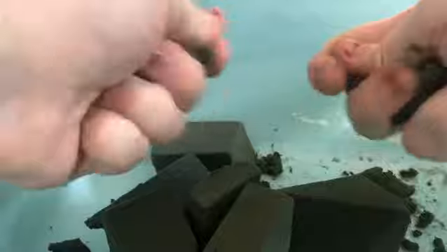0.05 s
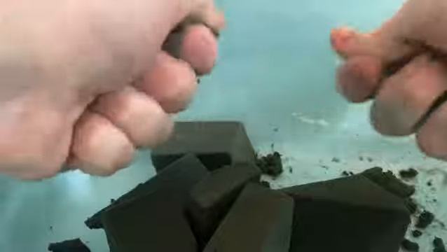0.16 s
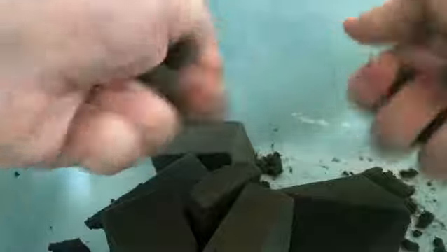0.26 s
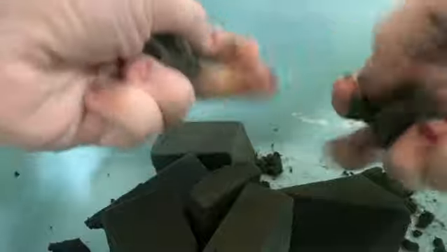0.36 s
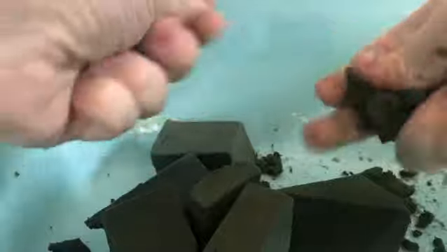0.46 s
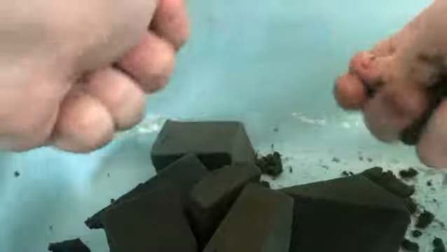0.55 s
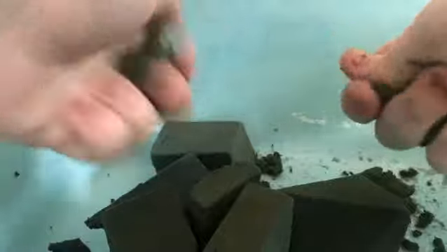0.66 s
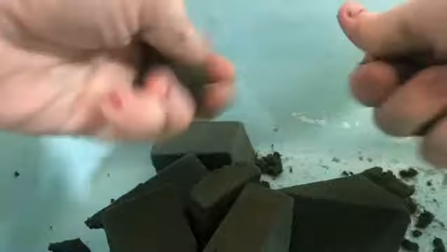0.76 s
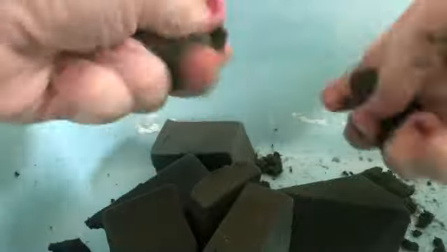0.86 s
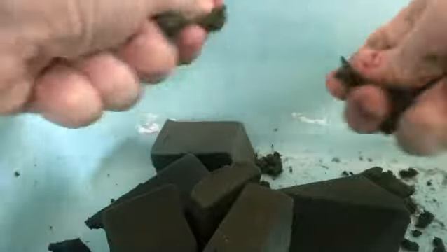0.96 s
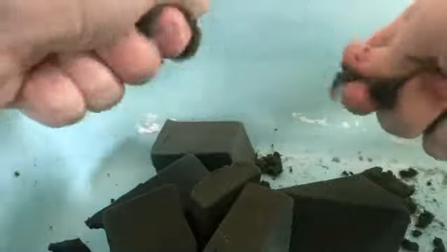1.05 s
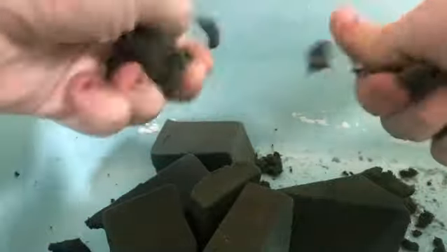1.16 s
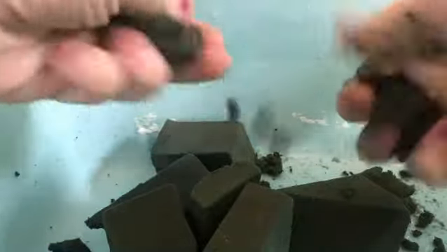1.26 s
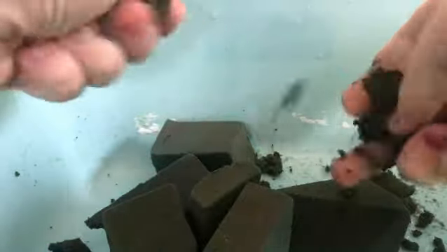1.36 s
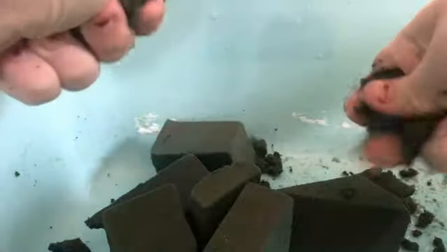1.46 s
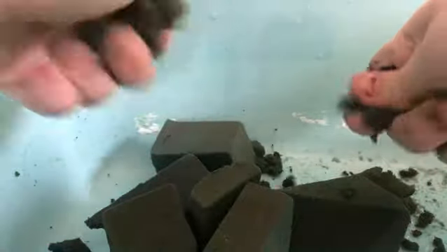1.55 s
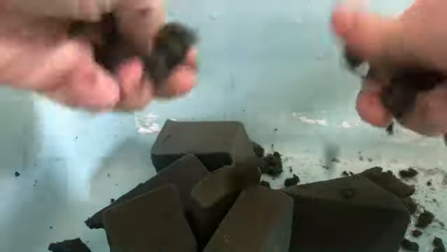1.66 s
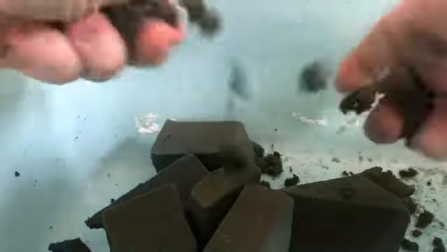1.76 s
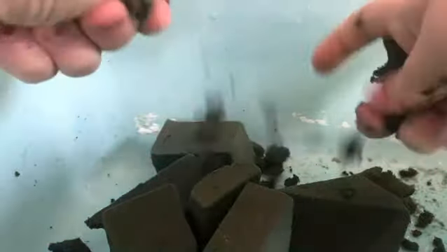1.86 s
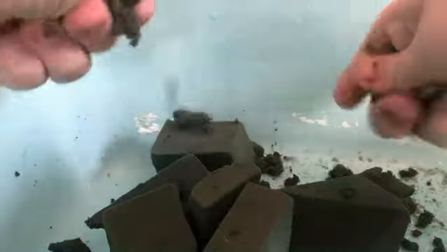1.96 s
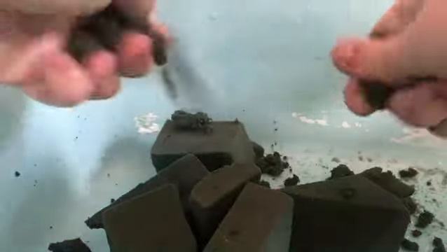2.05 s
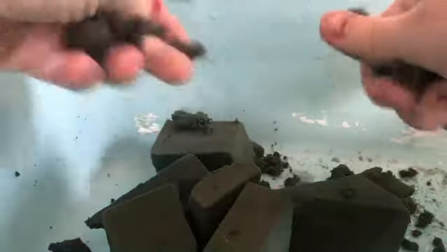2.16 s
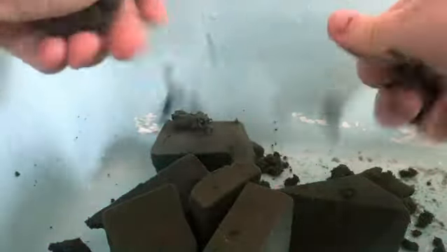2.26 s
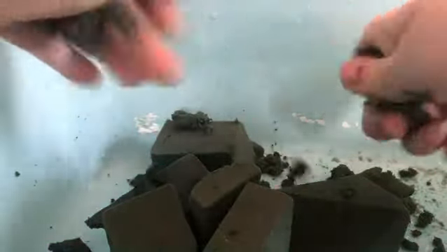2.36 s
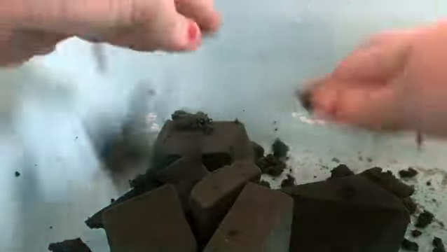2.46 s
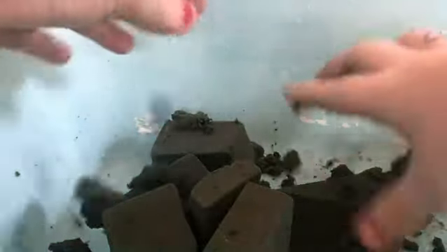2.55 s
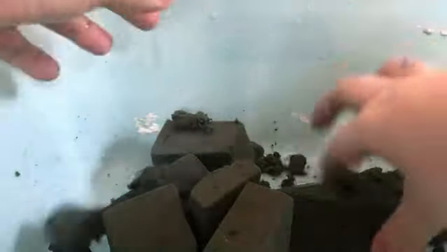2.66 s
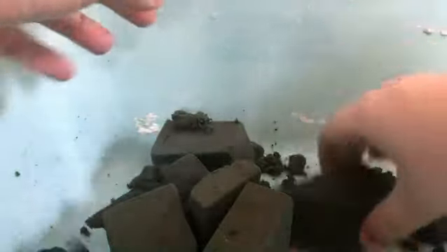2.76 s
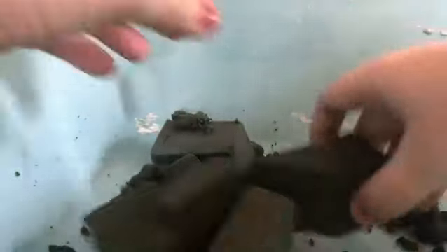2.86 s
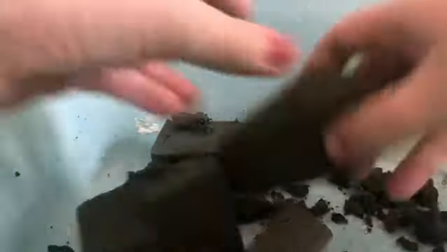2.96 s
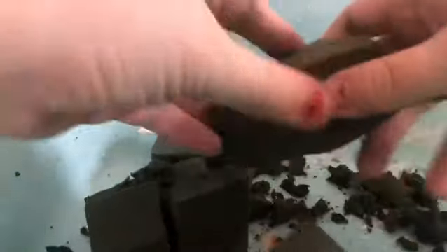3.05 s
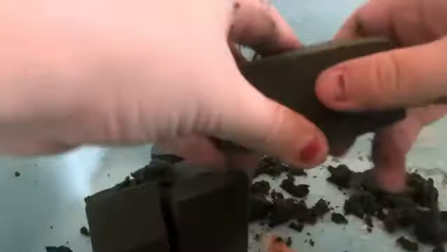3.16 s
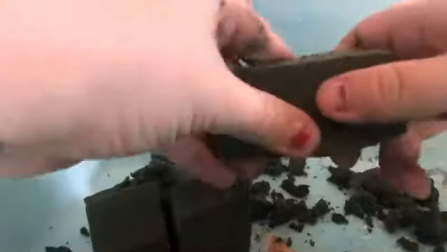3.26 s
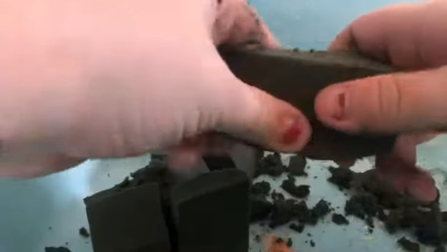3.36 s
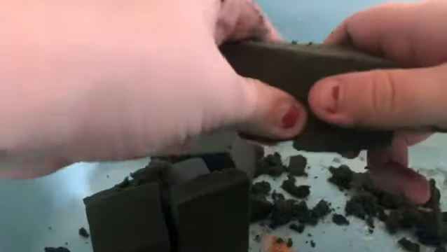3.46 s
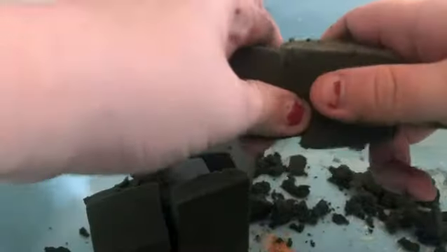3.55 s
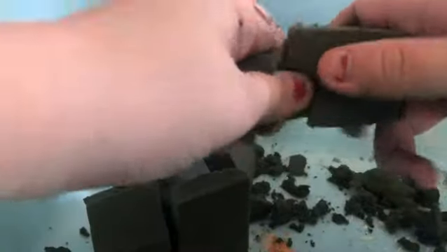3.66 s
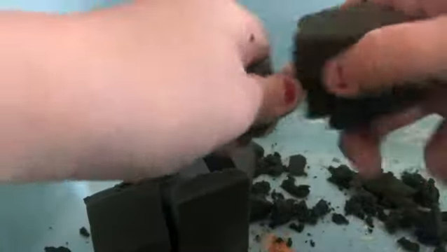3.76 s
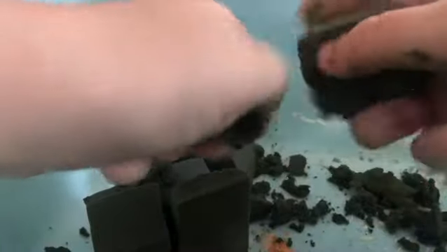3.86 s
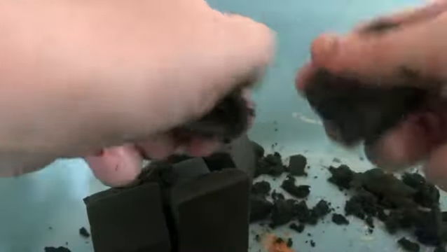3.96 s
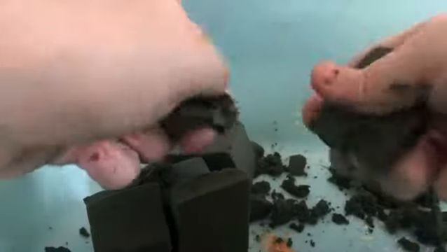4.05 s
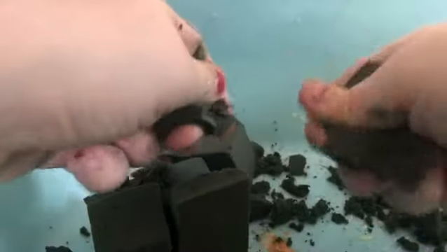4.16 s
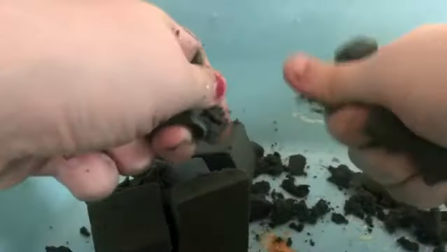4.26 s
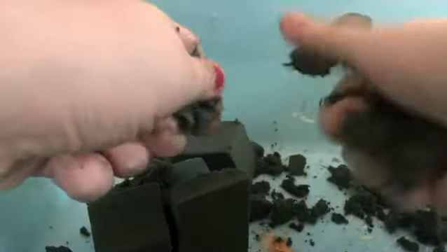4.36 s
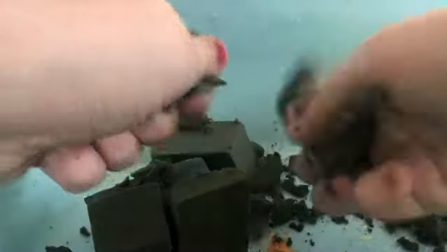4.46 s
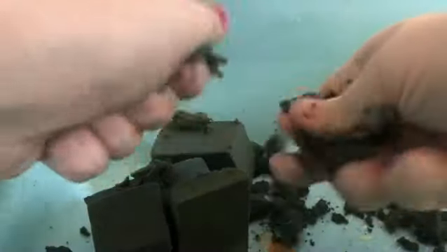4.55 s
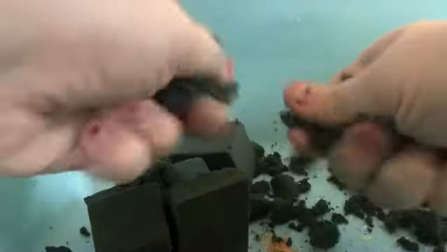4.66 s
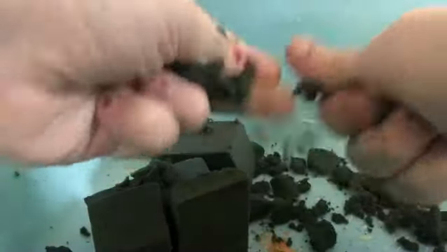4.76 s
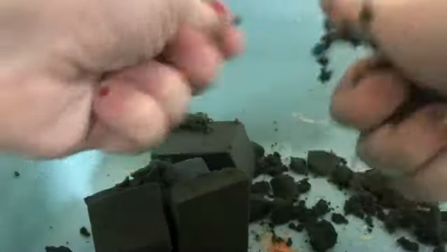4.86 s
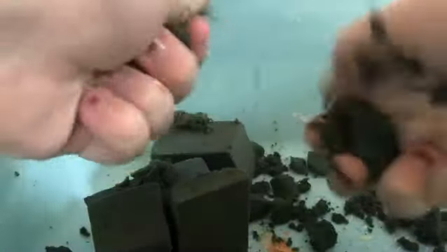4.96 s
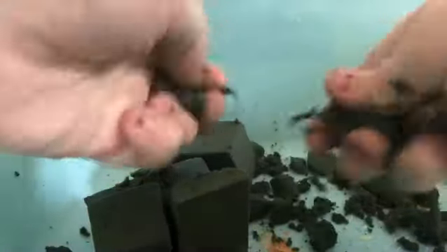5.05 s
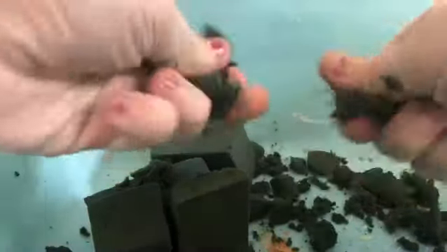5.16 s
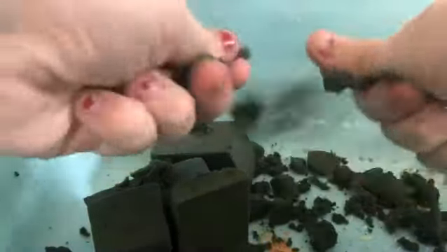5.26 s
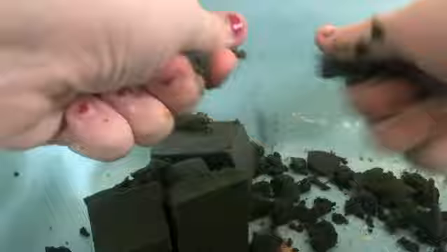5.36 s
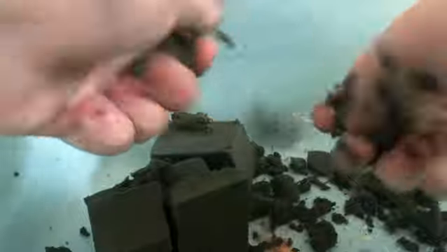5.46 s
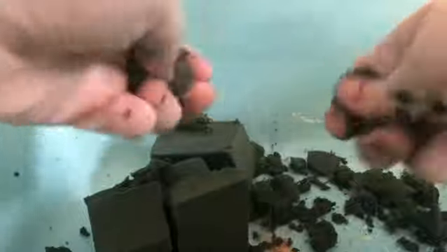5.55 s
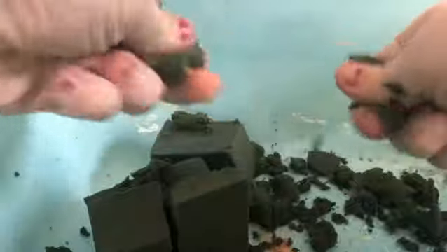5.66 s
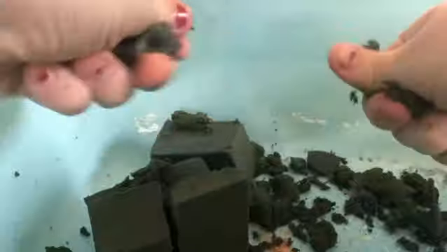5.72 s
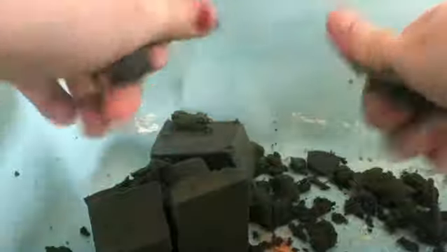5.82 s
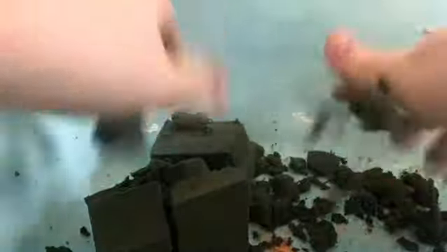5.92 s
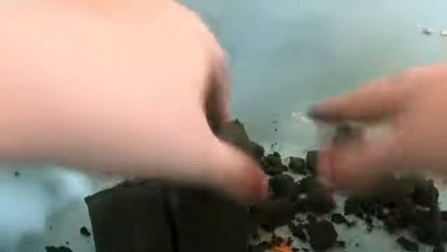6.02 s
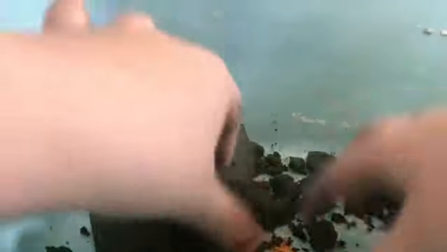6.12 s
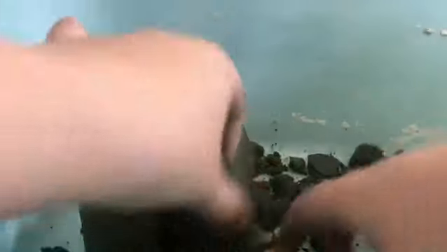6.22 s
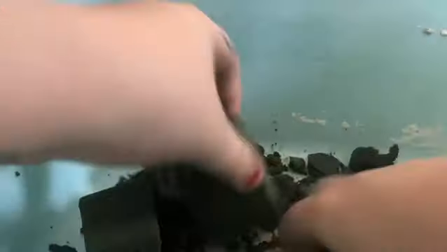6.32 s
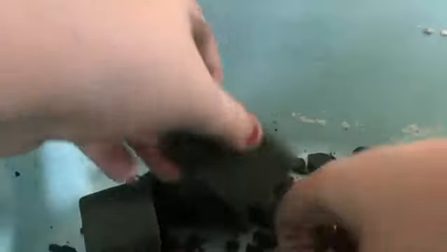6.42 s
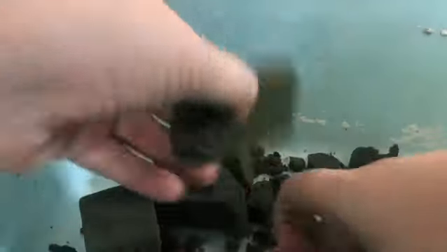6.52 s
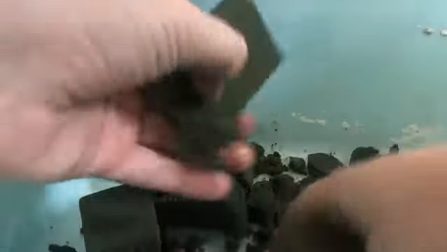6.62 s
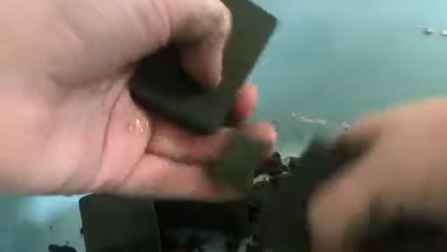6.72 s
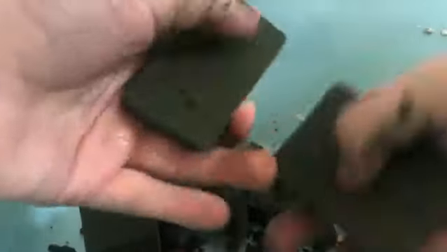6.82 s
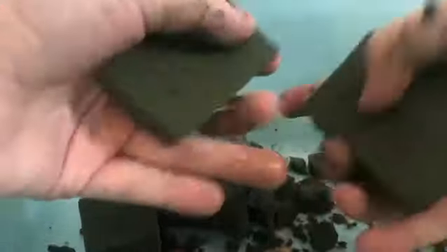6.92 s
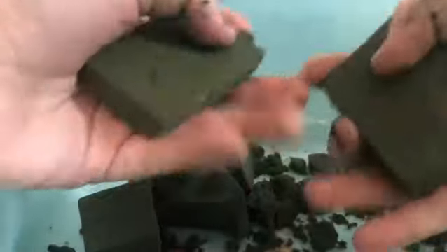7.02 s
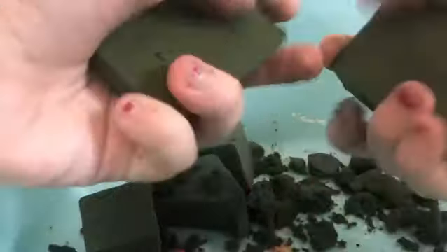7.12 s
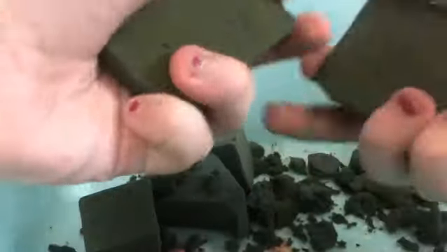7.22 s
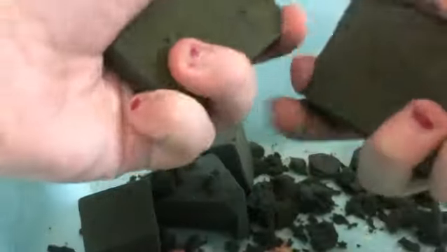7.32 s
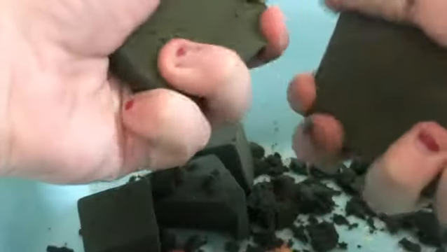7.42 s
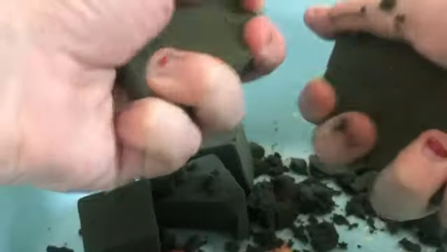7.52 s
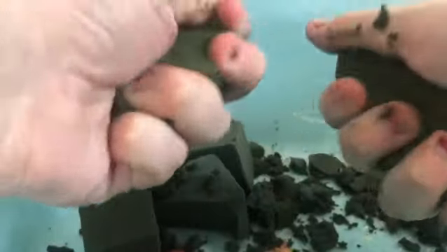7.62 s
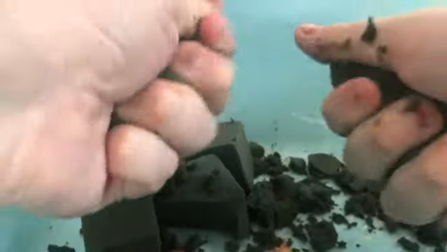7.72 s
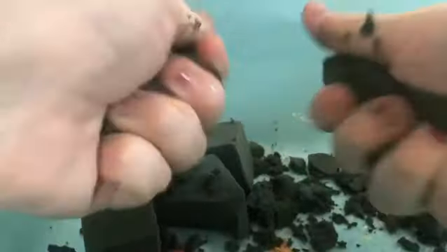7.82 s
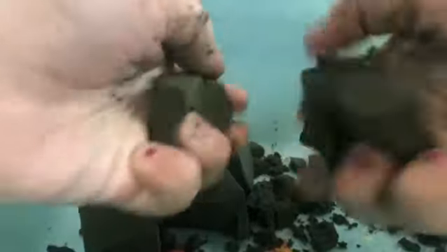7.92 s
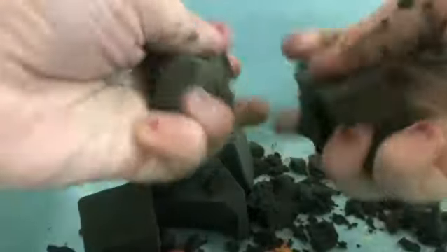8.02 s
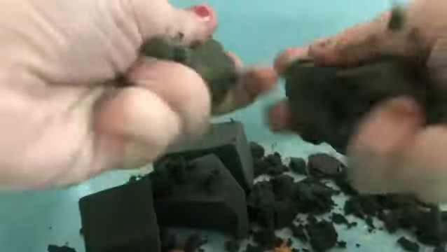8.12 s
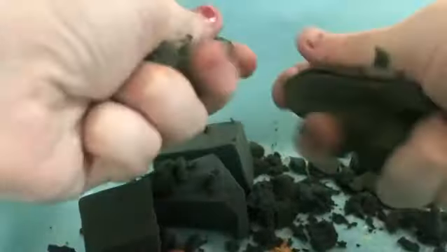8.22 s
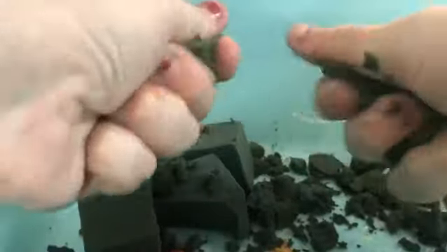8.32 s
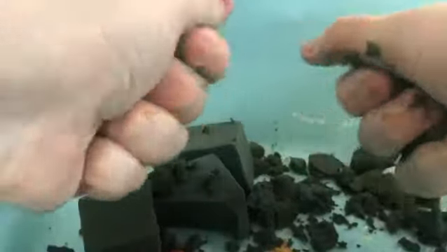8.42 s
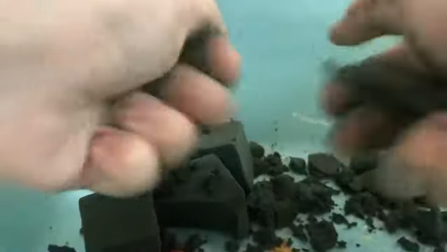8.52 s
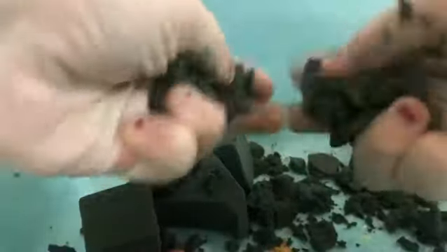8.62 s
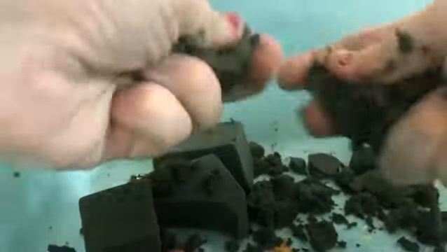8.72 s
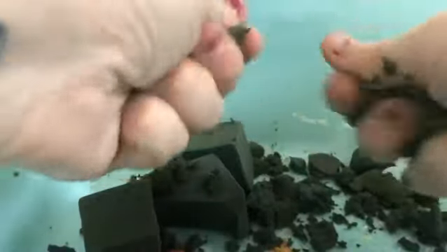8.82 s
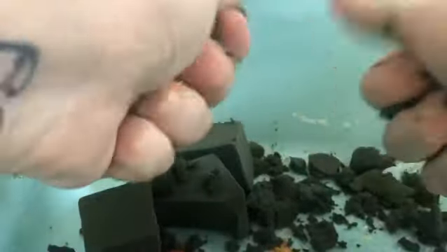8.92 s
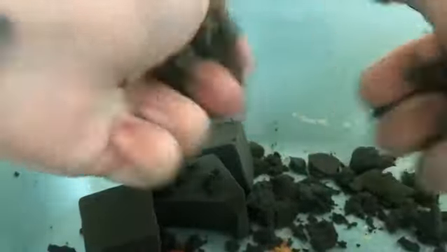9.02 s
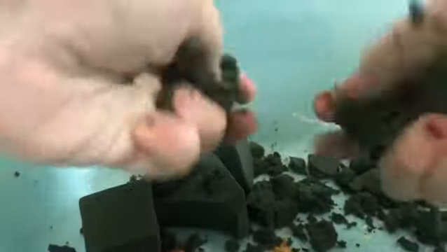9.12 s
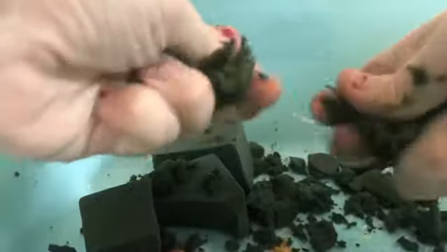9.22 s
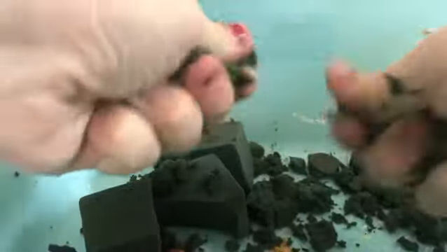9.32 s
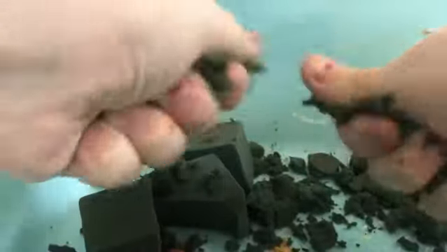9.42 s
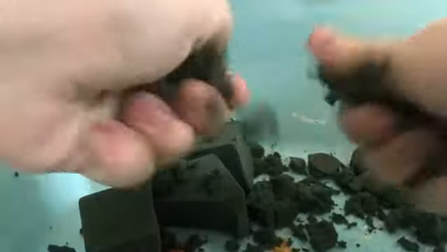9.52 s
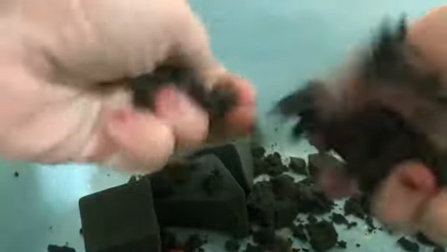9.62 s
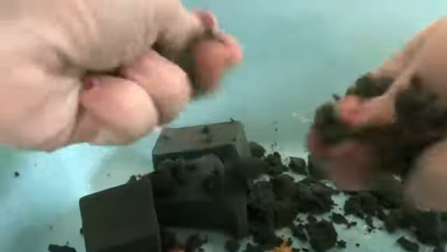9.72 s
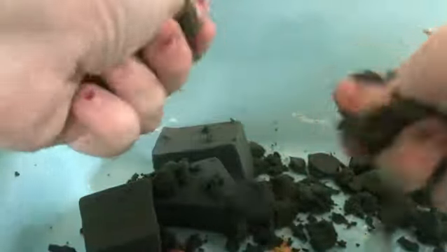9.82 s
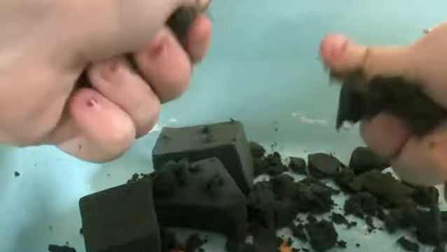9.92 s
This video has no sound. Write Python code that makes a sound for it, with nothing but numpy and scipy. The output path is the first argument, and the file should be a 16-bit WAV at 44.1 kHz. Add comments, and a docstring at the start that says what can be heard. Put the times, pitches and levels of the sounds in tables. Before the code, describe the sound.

Close, dry crunching of brittle foam blocks squeezed in fists: hissing powder, fine crackle, crumbs tapping a tub, then a dense volley of cracks.

```python
"""Two hands crush blocks of baked floral foam over a plastic tub, close to a microphone.
First the fists grind in soft hissing strokes: tiny grains make the powder, larger ones the crackle.
Then lumps knock on the tub floor and blocks drag through crumbs, before a sharp volley of noise-burst snaps.
Grinding, more knocks and drags lead to a second, denser volley near 7.3 s; quieter grinding ends it.
Random small cracks and crumbs fill in throughout; a short hollow ring colours the foam, over faint room air."""
import sys
import numpy as np
from scipy import signal
from scipy.fft import irfft
from scipy.io import wavfile
from scipy.ndimage import map_coordinates

SR = 44100
rng = np.random.default_rng(int(sys.argv[2]) if len(sys.argv) > 2 else 0)


def dump(signal):
    """Clip the signal to [-1, 1] and save it as 16-bit WAV at the path in sys.argv[1]."""
    limited = np.clip(np.atleast_2d(signal).T, -1, 1)
    pcm = np.round(limited * 32767).astype(np.int16)
    wavfile.write(sys.argv[1], SR, pcm)


N = 440118


def amp(db):
    """Decibels to gain."""
    return 10 ** (np.asarray(db) / 20)


def evened(x):
    """Scales to an rms of one."""
    return x / np.sqrt(np.mean(x ** 2) + 1e-20)


def add(mix, s, sound):
    """Adds a sound to the mix at a time in seconds."""
    part = mix[max(round(s * SR), 0):][:len(sound)]
    part += sound[:len(part)]


def coloured(x, points, size=4096):
    """Causal minimum-phase filter with the given spectrum, so that clicks keep their sharp front."""
    hz, db = np.transpose(points)
    bins_hz = abs(np.fft.fftfreq(size, 1 / SR))
    log_gain = np.log(amp(np.interp(np.log(bins_hz + 1), np.log(hz), db)))
    response = np.exp(np.conj(signal.hilbert(log_gain)))
    taps = np.fft.ifft(response).real[:size // 2]
    return evened(signal.oaconvolve(x, taps)[:len(x)])


def band(x, hz, spread, order=1):
    edges = [hz / spread, min(hz * spread, SR / 2 - 2000)]
    return signal.sosfilt(signal.butter(order, edges, "band", fs=SR, output="sos"), x)


def wander(per_s):
    """Random drift of unit size that heads for a new value per_s times a second."""
    points = rng.standard_normal(N // 10)
    return evened(np.interp(np.arange(N) / SR * per_s, np.arange(len(points)), points))


def grains(per_s, spread_db, cap):
    """Random clicks of either sign: many small ones, few large."""
    size_db = spread_db * np.minimum(rng.exponential(1, N), cap)
    clicks = amp(size_db) * rng.choice([-1, 1], N)
    return evened(clicks * (rng.random(N) < per_s / SR))


def room_air():
    """The faint air of the room: steady noise with a fixed colour."""
    # relative spectrum: (frequency [Hz], density [dB per Hz])
    air_spectrum = [(25, -30), (55, -2.5), (180, -4), (240, 4.5), (330, -2.5), (500, -24), (1500, -15),
                    (5000, -16.5), (16000, -21.5)]
    return amp(-63.5) * coloured(rng.standard_normal(N), air_spectrum)


def swell(s, rise, release):
    """Gain of one stroke of the hand, which builds to its peak and lets go; also its progress, -1 to 1."""
    shape = 1.285  # 1 is a pointed swell, 2 a round one
    t = np.arange(0, N, 44) / SR - s  # one point every 44 samples
    u = t / np.where(t < 0, rise, release)
    return amp(-10 * abs(u) ** shape), np.tanh(u)  # 10 dB down after one rise or release time


def together(gains):
    """Overlapping strokes add in power; gives a gain for every sample."""
    total = np.linalg.norm(gains, axis=0)
    return np.interp(np.arange(N), np.arange(0, N, 44), total) + 1e-9


def hands():
    """How strongly the strokes drive powder, crackle, scuffing and the rumble of the tub."""
    # a hand closing on the foam; levels drive the layers: (time of greatest pressure [s], rise [s],
    # release [s], fine powder [dB], coarse crackle at the peak [dB], scuffing [dB])
    squeezes = [(0.044,0.18,0.049,-35,-47.5,-64), (0.21,.048,.039,-35.5,-38,-54.5),
                (0.335,.017,.026,-42.5,-40,-59), (0.408,0.12,0.18,-38.5,-46.5,-67),
                (0.608,0.057,.041,-45,-50,-73), (0.746,0.072,.15,-38.5,-42.5,-75),
                (0.92,.08,.061,-38,-45,-73), (1.041,.039,0.034,-41.5,-41,-64),
                (1.185,.084,0.083,-42,-42,-67), (1.297,0.024,0.033,-38.5,-39.5,-64),
                (1.372,0.045,0.031,-44,-56,-76), (1.496,0.14,0.052,-39,-46,-74),
                (1.608,0.03,0.062,-44,-37,-66), (1.793,0.025,.022,-38,-41,-54),
                (1.95,0.23,0.067,-38.5,-48,-76), (2.135,0.16,0.058,-42,-41.5,-65),
                (2.331,0.14,0.017,-50,-52.5,-70), (3.298,0.041,0.027,-24.5,-29.5,-58),
                (3.479,.15,0.0803,-25,-30.5,-54), (3.695,0.053,0.018,-39.5,-42.5,-47),
                (3.795,0.056,0.034,-38,-40,-53), (3.992,0.087,0.055,-22.5,-29,-42.5),
                (4.079,0.02,.046,-29,-45,-48), (4.165,0.21,0.038,-26.5,-43,-45),
                (4.243,.028,.038,-38,-47,-62), (4.334,0.081,.035,-38.5,-47,-59),
                (4.511,0.1,0.175,-34,-43,-53.5), (4.772,.071,.107,-42,-46,-57),
                (5.064,0.11,0.19,-38,-42.5,-64), (5.49,0.099,0.053,-40.5,-43,-72),
                (5.614,.092,0.025,-37.5,-45,-64), (5.705,0.036,0.059,-42,-44.5,-65),
                (6.873,0.082,0.088,-36,-41.5,-48), (6.993,.025,.08,-34.5,-34.5,-42.5),
                (7.162,0.032,.14,-33.5,-38,-48), (7.352,.06,0.011,-25.5,-22.5,-41.5),
                (7.435,.06,0.087,-24,-24,-42), (7.585,0.21,0.046,-20,-34,-37),
                (7.794,.034,.012,-31.5,-35.5,-43), (7.824,0.055,0.32,-45,-48,-56),
                (8.042,0.059,0.084,-30,-35,-43.5), (8.165,0.048,.088,-22.5,-34.5,-44),
                (8.489,0.074,0.032,-41.5,-42,-52), (8.71,.15,0.068,-37,-40.5,-53),
                (8.79,.097,0.068,-37.5,-51,-52.5), (8.98,0.056,0.027,-44.5,-43.5,-63),
                (9.076,0.093,0.027,-50,-47.5,-62), (9.23,.13,0.05,-36.5,-40,-56),
                (9.311,.022,0.063,-38.5,-45,-62), (9.476,0.063,0.043,-42,-41.5,-58),
                (9.629,0.051,0.069,-41.5,-39.5,-51.5), (9.74,.17,.29,-39.5,-49.5,-64)]
    # blocks dragged through the crumbs in the tub; levels drive the layers: (time of fastest motion [s],
    # rise [s], hiss release [s], crumb hiss [dB], tub rumble [dB], scuffing [dB])
    drags = [(2.606,.024,0.037,-52,-52.5,-57), (2.741,0.011,.057,-50,-62,-55.5),
             (2.86,.098,.054,-46.5,-64,-51.5), (2.95,.031,0.13,-46,-56,-51.5),
             (3.184,0.0053,0.031,-39,-50,-61), (6.085,0.033,.021,-47,-58,-50),
             (6.205,0.033,0.066,-45,-51,-45.5), (6.326,0.093,.028,-43,-56,-50),
             (6.492,.12,.053,-44,-55,-50), (6.574,.018,0.1,-37.5,-68,-45.5),
             (6.687,0.012,0.073,-39,-64,-48)]
    spent_db = 0.9  # pieces crackle more while the hand closes, less once they are ground up
    squeeze_rumble_db, drag_crackle_db = -38.5, -1.7  # relative to the powder; to the hiss of the drag
    tub_rocks = 2.0  # the tub's rocking takes this many times longer to release than the drag
    fine, coarse, scuff, rumble = [], [], [], []
    for s, rise, release, powder_db, crackle_db, scuff_db in squeezes:
        push, progress = swell(s, rise, release)
        fine.append(push * amp(powder_db))
        coarse.append(push * amp(crackle_db - spent_db * progress))
        scuff.append(push * amp(scuff_db))
        rumble.append(push * amp(powder_db + squeeze_rumble_db))
    for s, rise, release, hiss_db, rumble_db, scuff_db in drags:
        push, _ = swell(s, rise, release)
        rock, _ = swell(s, rise, release * tub_rocks)
        fine.append(push * amp(hiss_db))
        coarse.append(push * amp(hiss_db + drag_crackle_db))
        scuff.append(rock * amp(scuff_db))
        rumble.append(rock * amp(rumble_db))
    return [together(gains) for gains in (fine, coarse, scuff, rumble)]


def rubbing(sliding, nudging):
    """Rough faces catch and slip; the tub rumbles softly when it is nudged."""
    # relative spectra of scuffing and tub rumble: (frequency [Hz], density [dB per Hz])
    scuff_spectrum = [(60, -25), (200, -11.5), (290, -4.5), (375, 1), (520, -6.5), (660, -4), (780, 3.5),
                      (900, -3), (1080, -4), (1600, -13.5), (4000, -37)]
    rumble_spectrum = [(25, -36), (37, -13), (50, -3.5), (72, -5.5), (118, 2.5), (145, -4.5), (172, 0),
                       (250, -7), (500, -27.5), (1500, -47)]
    # the hands are never quite still: floors under the drive of rumble and scuff
    tremble_db, fingers_db = -68.5, -65.5
    catches = grains(per_s=1500, spread_db=2.5, cap=2.6) * amp(2 * wander(per_s=60))
    scuff = coloured(catches, scuff_spectrum) * np.hypot(sliding, amp(fingers_db))
    nudges = rng.standard_normal(N) * amp(3.1 * wander(per_s=22))
    rumble = coloured(nudges, rumble_spectrum) * np.hypot(nudging, amp(tremble_db))
    return amp(-1) * scuff + amp(3.0) * rumble


def bumps(size=2048):
    """A piece shifts with a dull, well damped pop and grates briefly against its neighbour."""
    # pieces bumping together in the hands; level is the energy as 10 ms of steady sound, ahead of the
    # layer gain: (time [s], level [dB], centre [Hz])
    contacts = [(0.158, -47, 800), (1.03, -50.5, 580), (3.683, -40, 600), (3.882, -42.5, 730),
                (3.978, -30.5, 810), (6.087, -36.5, 800), (6.464, -49, 516), (6.562, -54, 560),
                (6.616, -41, 640), (6.994, -26, 677), (7.197, -24.5, 730), (7.344, -29.5, 680),
                (7.605, -34.5, 550), (7.79, -36.5, 620), (8.233, -39, 780), (8.532, -51, 620),
                (8.969, -46, 830), (9.484, -45, 714), (9.596, -48, 660)]
    out, t = np.zeros(N), np.arange(size) / SR
    for s, db, hz in contacts:
        pop = np.sin(2 * np.pi * hz * t) * (1 - np.exp(-t / 0.00079)) * np.exp(-t / 0.002)
        grate = band(rng.standard_normal(size) * np.exp(-t / 0.0093), hz, spread=1.84, order=2)
        bump = evened(evened(pop) + 0.84 * evened(grate))
        add(out, s, amp(db) * bump * np.sqrt(SR / 100 / size))
    return amp(-1) * out


def falling_crumbs(count=30):
    """Crumbs slip from the fists at random moments, as (time [s], level [dB], centre [Hz])."""
    level_db, spread_db, centre_hz = -57, 5, 604
    rows = []
    for place, strength, colour in rng.random((count, 3)):
        db = level_db + spread_db * (2 * strength - 1)
        rows.append((place * N / SR, db, centre_hz * 2 ** (colour - .5)))
    return rows


def tub_ring(size=8192):
    """The tub's modes, each struck with a strength that depends on the spot."""
    # (frequency [Hz], greatest relative level [dB], time to fall 60 dB [s])
    modes = [(118, 3, 0.2), (171.2, 0, 0.18), (273, -12.5, 0.14), (330, -14, 0.22), (374.3, -2.5, 0.093),
             (525, -20, .07), (716.6, -6.5, 0.093), (770, -1, 0.083), (818, -2.5, 0.058), (1073, -2, 0.072)]
    t = np.arange(size) / SR
    ring = np.zeros(size)
    for hz, db, t60 in modes:
        strength = rng.uniform(0.41, 1) * rng.choice([-1, 1])
        ring += strength * amp(db - 60 * t / t60) * np.sin(2 * np.pi * hz * t)
    return ring


def knocks(size=8192):
    """A lump taps the thin tub floor; high bending waves outrun low ones, so each knock falls in pitch."""
    # lumps landing in the tub; level is the energy of the knock's body as 10 ms of steady sound:
    # (time [s], level [dB], centre [Hz])
    lumps = [(1.221, -50, 378), (1.298, -46.5, 336), (1.579, -52, 310), (1.749, -42, 495),
             (1.862, -51, 358), (2.13, -48, 620), (2.199, -46, 610), (2.232, -44.5, 426), (2.362, -50, 600),
             (2.411, -41, 280), (2.462, -44, 484), (2.508, -49, 360), (2.542, -48, 410),
             (2.605, -41.5, 430), (2.628, -53, 372), (2.738, -44, 380), (2.957, -40.5, 308),
             (3.153, -34, 202), (4.373, -43, 650), (4.463, -42.5, 461), (5.19, -41, 700), (5.244, -45, 318),
             (5.814, -34, 215), (5.869, -43.5, 424), (5.901, -42, 485), (5.925, -44.5, 406),
             (5.959, -39.5, 349), (6.047, -45.5, 452), (6.063, -43, 380), (6.13, -44, 270),
             (6.211, -50, 314), (6.276, -41, 383.6), (6.791, -39, 465), (8.532, -51, 270),
             (9.522, -46, 352.8), (9.838, -43.5, 229)]
    out, t = np.zeros(N), np.arange(size) / SR
    f = np.fft.rfftfreq(size, 1 / SR)
    for s, db, hz in [*lumps, *falling_crumbs()]:
        lag = 0.00308 * rng.uniform(0.63, 1.41)  # travel time [s] at 400 Hz, falling as the root of frequency
        bending = irfft(np.exp(-4j * np.pi * lag * np.sqrt(400 * f)))
        settle = rng.standard_normal(size) * np.exp(-t / 0.00775)
        thump = band(evened(bending) + evened(settle), hz, spread=1.8, order=2)
        ring = band(signal.oaconvolve(tub_ring(), bending)[:size], hz, spread=1.64, order=2)
        body = band(evened(thump) + 1.4 * evened(ring), 330, spread=4.9, order=4)
        tick = band(rng.standard_normal(size) * np.exp(-t / 0.0071), 1900, spread=3.4)
        knock = evened(body) + amp(-17) * evened(tick)
        add(out, s, amp(db) * knock * np.sqrt(SR / 100 / size))
    return out


def drifting(x, depth_db, slow, wide):
    """Shifting fingers open and close small hollows: patches of the spectrum swell and fade."""
    hz, t, z = signal.stft(x, SR, nperseg=512)
    field = rng.standard_normal((120, 800))
    at = np.meshgrid(np.log(hz + 400) / wide, t / slow, indexing="ij")
    patches = evened(map_coordinates(field, at, order=1, mode="wrap"))
    _, drifted = signal.istft(z * amp(depth_db * patches), SR, nperseg=512)
    return evened(drifted[:N])


def crumbling(fine, coarse):
    """Cell walls break by the thousand, in little avalanches shared by powder and coarser crumbs."""
    # relative spectra of hissing powder, coarse crumbs and high grit: (frequency [Hz], density [dB per Hz])
    powder_spectrum = [(300, -43), (1200, -13), (2500, -12), (4000, -4.5), (5200, -1.5), (7000, 1.5),
                       (11000, -0.1), (16000, -1.5)]
    crumb_spectrum = [(150, -21), (400, -13), (560, -16), (790, -5.5), (930, -13), (1120, -7.5), (1400, -4),
                      (1850, -0.5), (2350, -0.5), (2850, 2), (3900, -1), (5500, -5.5), (9000, -15.5),
                      (16000, -25)]
    grit_spectrum = [(150, -27), (380, -13), (560, -12.5), (790, -7.5), (1000, -17.5), (2200, -3.5),
                     (3200, -4.5), (3950, 2.5), (4500, -0.5), (5200, -7), (9000, -19.5), (16000, -24)]
    avalanche = wander(per_s=490) + 1.24 * wander(per_s=110)
    firm = coarse / (coarse + amp(-30))  # whole pieces break in bigger jerks than loose powder
    avalanche *= 0.73 + .65 * firm
    powder = coloured(grains(per_s=22000, spread_db=1.0, cap=3.3) * amp(1.16 * avalanche), powder_spectrum)
    crumbs = coloured(grains(per_s=3500, spread_db=4.0, cap=3.4) * amp(2.0 * avalanche), crumb_spectrum)
    grit = coloured(grains(per_s=7000, spread_db=3.5, cap=3.3) * amp(1.5 * avalanche), grit_spectrum)
    # a tight fist leaves only the small, high grit
    loose = coarse ** 2 / (coarse ** 2 + (amp(-4.5) * fine) ** 2)
    pieces = np.sqrt(loose) * crumbs + np.sqrt(1 - loose) * grit
    chunks = drifting(pieces, depth_db=2.0, slow=.035, wide=.18)
    dust = drifting(powder, depth_db=1.1, slow=.06, wide=.12)
    return amp(2.2) * dust * fine + amp(0.35) * chunks * coarse


def stress(fractures):
    """Crackle builds just before each fracture and pauses just after it, when the load is shed."""
    hits, t = np.zeros(N), np.arange(-1024, 1024) / SR
    for s, db, _, _ in fractures:
        add(hits, s, np.array([min(amp(db / 2), 1.)]))
    build_db = 3 * np.exp(-((t + .0005) / 0.0012) ** 2)
    pause_db = 7 * np.exp(-((t - .008) / 0.0023) ** 2)
    return amp(signal.oaconvolve(hits, build_db - pause_db, "same"))


def small_cracks(fine, count=900):
    """Lesser fractures come at random, more often and louder the harder the grip; rows as for big ones."""
    full_rate, full_grip_db = 55, -30  # cracks per second, and the powder drive from which they reach it
    offset_db, spread_db, centre_hz, mean_s = 1, 4.5, 7040, .001
    rows = []
    for place, chance, strength, colour, length in rng.random((count, 5)):
        grip = fine[int(place * N)]
        if chance * count < full_rate * N / SR * min(grip / amp(full_grip_db), 1):
            db = 20 * np.log10(grip) + offset_db + spread_db * strength
            rows.append((place * N / SR, db, centre_hz * 2 ** (colour - .5), mean_s * (.5 + length)))
    return rows


def all_fractures(fine):
    """The big fractures that give way in volleys, and the small ones that the grip brings on."""
    # big fractures; level is the energy as 1 ms of steady sound, ahead of the layer gains:
    # (time [s], level [dB], nominal centre [Hz], length of the tear [s])
    big = [(0.1565, -30.5, 3180, 0.0014), (1.285, -28, 4264, 0.006), (1.9375, -27, 4990, 0.0026),
           (2.605, -40, 2200, 0.0025), (3.01, -33.5, 4400, 0.0022), (3.26, -19.5, 5700, .0016),
           (3.304, -9.5, 5430, .0018), (3.3414, -26, 4480, 0.00076), (3.445, -3.5, 6150, 0.0022),
           (3.454, -13.5, 5350, 0.0016), (3.47, -24, 6000, 0.0018), (3.603, -20.5, 6060, 0.0018),
           (3.7614, -25, 6400, 0.0029), (3.9624, -18, 5800, 0.0019), (4.001, -21, 6000, 0.00131),
           (4.079, -20, 8000, .0014), (4.0937, -15, 6200, 0.0012), (4.24, -20.5, 5464, 0.0017),
           (4.26, -21, 4050, 0.0011), (4.3315, -23, 6440, 0.0013), (4.793, -29, 5862, .0024),
           (5.042, -21, 4600, 0.0031), (5.0563, -23.5, 4900, 0.002), (5.964, -45, 4510, 0.0013),
           (6.559, -30.5, 4566, 0.00348), (7.195, -16.5, 5470, 0.00123), (7.211, -17, 7550, 0.0016),
           (7.222, -18, 6000, 0.0022), (7.238, -17, 7450, 0.0027), (7.2765, -20, 4220, 0.0019),
           (7.2875, -17.5, 6500, 0.0018), (7.325, -14, 3880, 0.0017), (7.337, -9.5, 3000, 0.0012),
           (7.342, -17, 5000, .0011), (7.3522, -10.5, 4540, 0.0021), (7.3573, -8, 4600, 0.00091),
           (7.361, -11, 5500, .0013), (7.3825, -9, 5870, .003), (7.3965, -6.5, 3000, 0.0025),
           (7.408, -10.5, 4200, .0021), (7.411, -9, 5300, 0.0018), (7.4176, -11, 4470, .0011),
           (7.4257, -7.5, 3700, .0014), (7.4413, -13.5, 6800, .0008), (7.45, -15, 6200, .0021),
           (7.455, -13, 6600, 0.0022), (7.465, -10.5, 3300, .0011), (7.479, -9, 7000, 0.0024),
           (7.4987, -11, 5000, 0.0012), (7.5486, -11.5, 7690, .002), (7.606, -16.5, 9000, 0.0013),
           (7.794, -27, 5500, .003), (7.999, -15.5, 5300, 0.0011), (8.036, -23, 5500, 0.00193),
           (8.0454, -17.5, 8520, 0.002), (8.1494, -13, 5400, 0.0039), (8.158, -12.5, 6610, .0013),
           (8.175, -13.5, 6500, 0.0025), (9.597, -29.5, 3900, 0.0021)]
    return [*big, *small_cracks(fine)]


def snaps(fractures, size=1024):
    """A crack tears through the cells in a millisecond or two and rings the piece; thick pieces sound lower."""
    out, t = np.zeros(N), np.arange(size) / SR
    for s, db, hz, length in fractures:
        tear = rng.standard_normal(size) * (np.exp(-(t / length) ** 2) + 0.18 * np.exp(-t / 0.0065))
        tear[round(rng.uniform(0, .5) * length * SR)] += 4.68 * rng.choice([-1, 1])  # one sharp click
        piece = band(tear, hz * rng.uniform(0.42, 1.0), spread=1.41)
        crack = evened(band(tear, hz * 0.99, spread=1.66)) + 0.7 * evened(piece)
        crack = band(crack, 4600, spread=9.1)
        add(out, s, amp(db) * evened(crack) * np.sqrt(SR / 1000 / size))
    return amp(1.0) * out


def tub_echo(x, wet_db, t60, size=8192):
    """The close walls return a dense, quickly dying cloud of reflections."""
    t = np.arange(size) / SR
    cloud = rng.standard_normal(size) * amp(-60 * t / t60) * (t > .001)
    cloud = band(cloud, 3600, spread=5.3)
    return x + amp(wet_db) * signal.oaconvolve(x, cloud / np.linalg.norm(cloud))[:N]


def hollow(x):
    """The air between the walls rings briefly at a few pitches."""
    # resonances added to the direct sound: (frequency [Hz], width [Hz], level [dB])
    resonances = [(1074, 52, -3), (1647, 33, -9), (1805, 21, -10), (1928, 72, -6.5), (2480, 19, -25),
                  (2790, 48, -7), (3960, 55, -8), (4300, 54, -16)]
    ringing = np.zeros(N)
    for hz, width, db in resonances:
        b, a = signal.iirpeak(hz, hz / width, SR)
        ringing += amp(db) * signal.lfilter(b, a, x)
    return x + ringing


def scene():
    """Crushing, handling and falling lumps over the faint air of the room."""
    fine, coarse, scuff, rumble = hands()
    handling = rubbing(scuff, rumble) + bumps() + knocks()
    fractures = all_fractures(fine)
    grinding = crumbling(fine, coarse) * stress(fractures)
    foam = tub_echo(grinding + snaps(fractures), wet_db=-11, t60=0.036)
    return (room_air() + handling + amp(-0.83) * hollow(foam))[None]


def record(dry):
    """A small microphone without deep bass; the loudest cracks are rounded off; then the band limit."""
    ceiling, bass_hz, edge_hz = .8, 42, 15900  # ceiling relative to full scale
    rounded = dry / (1 + (dry / ceiling) ** 4) ** .25
    thin = signal.sosfilt(signal.butter(5, bass_hz, "high", fs=SR, output="sos"), rounded)
    lowpass = signal.firwin(511, edge_hz, window=("kaiser", 9), fs=SR)
    return signal.oaconvolve(thin, lowpass[None], "same")


dry = scene()
out = record(dry)
dump(out)
```